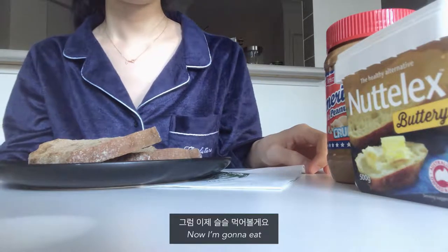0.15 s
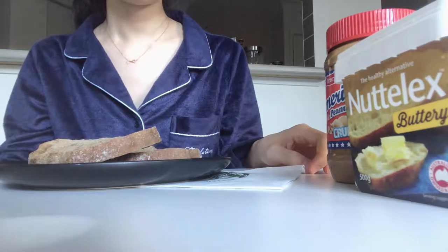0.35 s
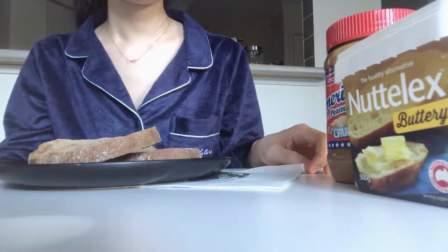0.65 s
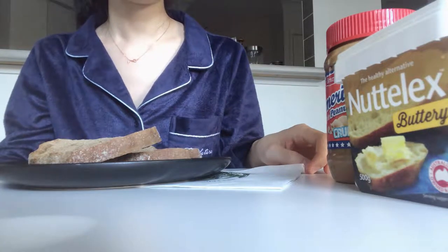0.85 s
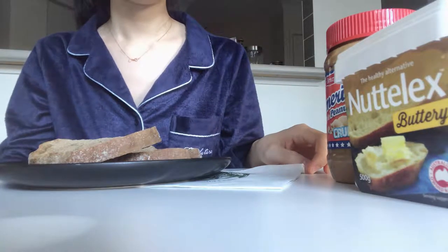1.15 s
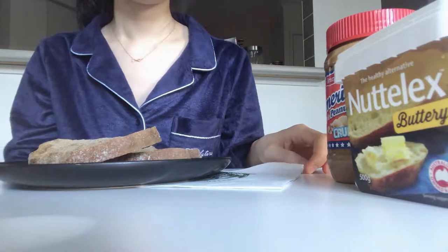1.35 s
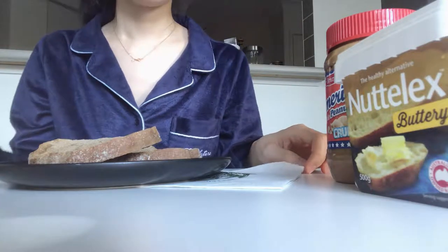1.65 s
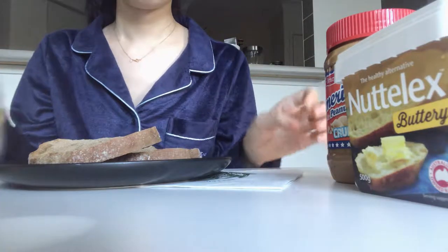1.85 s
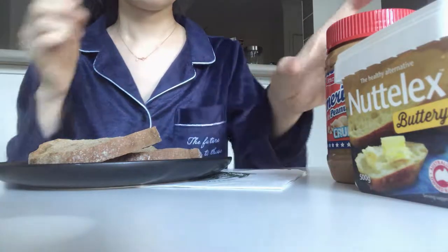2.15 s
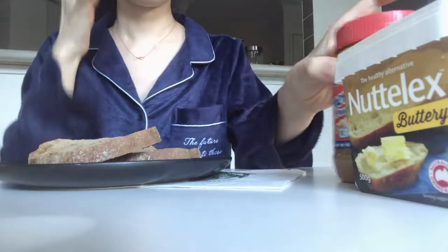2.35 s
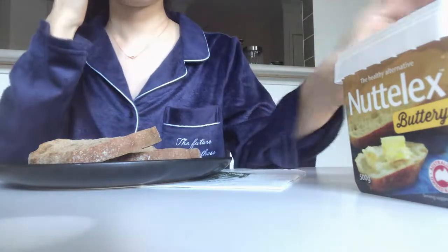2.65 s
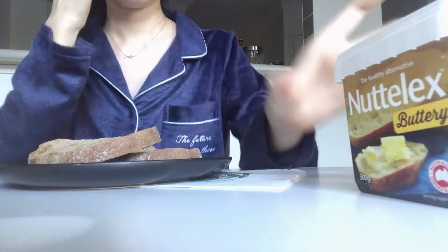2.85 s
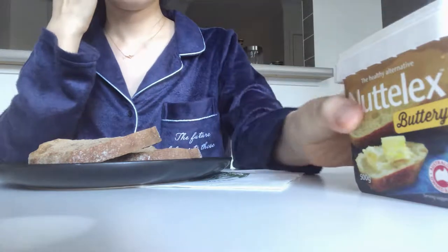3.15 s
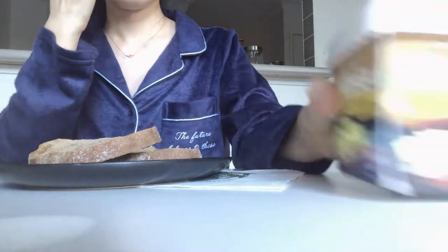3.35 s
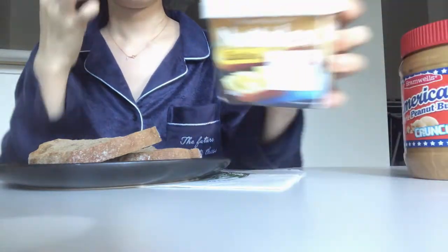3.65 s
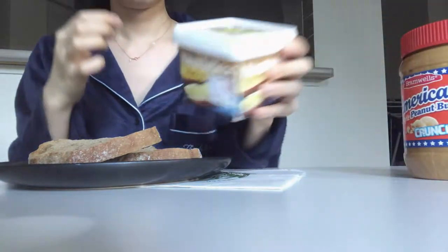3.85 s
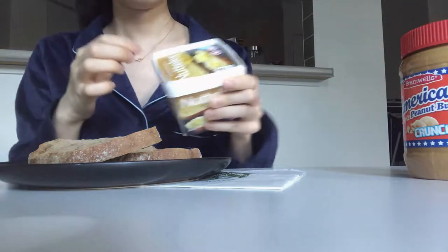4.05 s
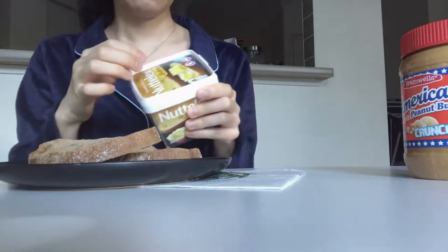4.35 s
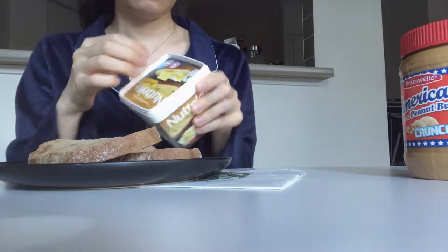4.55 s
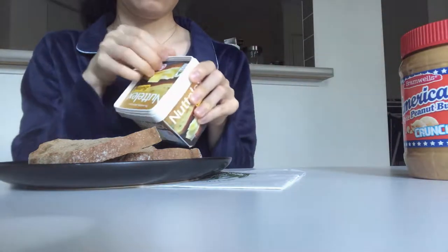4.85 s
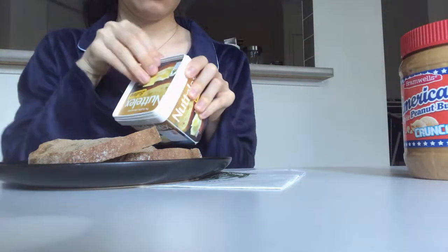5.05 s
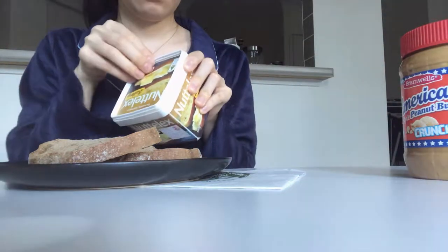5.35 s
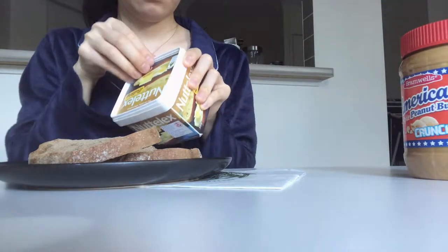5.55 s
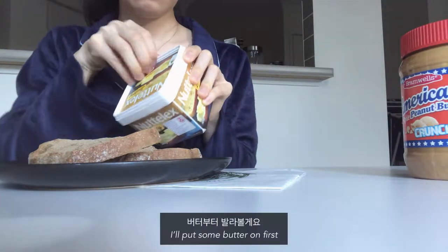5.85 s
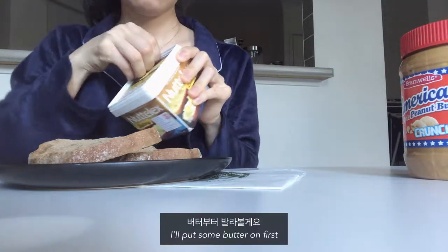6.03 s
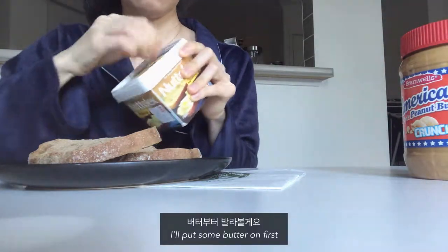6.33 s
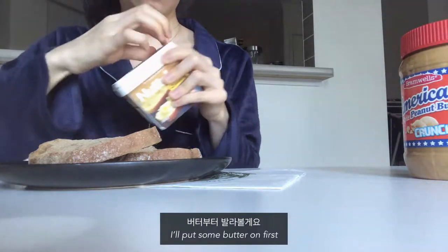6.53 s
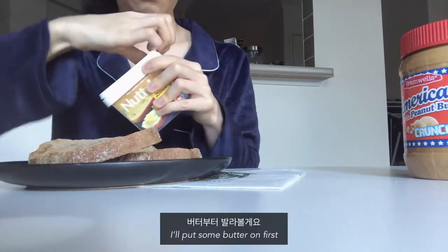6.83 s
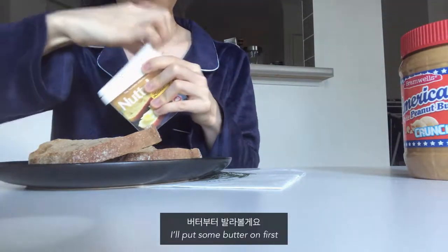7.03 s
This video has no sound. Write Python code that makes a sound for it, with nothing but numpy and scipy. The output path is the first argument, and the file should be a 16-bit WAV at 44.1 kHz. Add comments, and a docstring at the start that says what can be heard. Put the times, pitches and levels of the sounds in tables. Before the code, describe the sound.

Over still room air and a faint unsteady hum, hollow wood is knocked twice, the first blow louder, with weak contacts trailing. After a near pause, cloth swishes across the table with low soft bumps. A quick plastic drag ends in a rattling knock as a tub leaves the surface. Gentle rubbing and light clicks lead to firmer lid snaps, recorded near in mono with short room reflections.

```python
"""At a table in a quiet room, one mono microphone: first a few dull wooden knocks, then a faint thin whistle with a
short dropout. After a tick and a soft brush a sleeve slides over the table top, and a plastic tub is dragged,
chatters on its edge and lifts. Last, fingers rub and pry at the lid, which ticks, snaps along the rim and comes off.
Blows are bending waves, treble first, that ring wood or plastic modes; rubs and cloth are filtered grains of slip.
The room echoes and rings after it all, over still air and a faint, slightly unsteady hum."""
import sys
import numpy as np
from scipy import signal
from scipy.fft import rfft, irfft, next_fast_len
from scipy.io import wavfile
from scipy.ndimage import uniform_filter1d

SR = 44100
rng = np.random.default_rng(int(sys.argv[2]) if len(sys.argv) > 2 else 0)


def int16_out(signal):
    """Quantize to a 16-bit WAV file."""
    q = np.round(np.clip(np.atleast_2d(signal).T, -1, 1) * 32767)
    wavfile.write(sys.argv[1], SR, q.astype(np.int16))


N = 317079
TIME = np.arange(N) / SR  # s
TOP_HZ = 15900  # upper limit of the microphone signal
BLOW = 4096  # samples in the spectrum of one blow
BLOW_HZ = np.maximum(np.fft.rfftfreq(BLOW, 1 / SR), 1)
FULL_SIZE = next_fast_len(N + SR, True)
FULL_HZ = np.maximum(np.fft.rfftfreq(FULL_SIZE, 1 / SR), 1)

# Knocks on the wood. Each row: start in seconds, level in dB, contact cut-off in Hz, hollow boom in Hz, then
# boom, ringing, edge tick and rebound, each in dB re the level.
KNOCKS = [(0.7352, -15, 1240, 388, -15, -19, -37, -12), (0.9246, -21, 1470, 298.6, -3, -17, -36, -14.5),
          (1.172, -57.5, 595, 330, 2, -6.5, -30, 1), (1.256, -44.5, 948, 301, -1, -7.5, -19, 4.5)]
# Modes of the wood. Each row: pitch in Hz, level in dB re the knock's ringing, t60 in seconds.
WOOD = [(82, -3.5, 0.31), (120, -11.5, 0.45), (159.1, -13.5, 0.5), (202, 7.5, 0.17), (230, -6, 0.19),
        (294, -1.5, 0.25), (325.3, 0, 0.27), (377.6, 1.5, 0.31), (429, 1.5, 0.07), (486, -8.5, 0.68),
        (529, 3, 0.18), (555.7, 0.5, 0.23), (629, 3.5, 0.17), (760, -8.5, 0.15), (831, 3, 0.12),
        (1040, -18, 0.06), (1223, -2.5, 0.13), (1330, 2, 0.077), (1560, -16, 0.18), (1885, -7, 0.1)]
# The struck wood jolts back after every knock. Each row: delay in seconds, pitch in Hz, dB re the rebound.
REBOUNDS = [(.0068, 272, -1.5), (0.0112, 457, -1), (.022, 175, -6.5)]


def knocks(thud_hz=720, thud_width=850, lag=0.002714, edge_hz=2450, hollow_t60=0.16,
           jitter=0.18, jitter_share=0.0906):
    """Each knock sends a short thud through hollow wood; the modes share the ring a little differently each time."""
    out = np.zeros(N)
    t = np.arange(SR) / SR
    for s, db, contact_hz, boom_hz, boom_db, ring_db, tick_db, rebound_db in KNOCKS:
        soft = 1 / np.sqrt(1 + (BLOW_HZ / contact_hz) ** 4)
        soft = soft / np.sqrt(1 + (BLOW_HZ / edge_hz) ** 16)
        add(out, s, undb(db) * bend(resonance(BLOW_HZ, thud_hz, thud_width) * soft, lag))
        add(out, s, undb(db + tick_db) * crack(0.0062, hz=4000))
        for delay, hz, jolt_db in REBOUNDS:
            add(out, s + delay, undb(db + rebound_db + jolt_db) * thud(hz))

        modes = [(boom_hz, boom_db, hollow_t60)]
        for hz, wood_db, t60 in WOOD:
            # where the knock lands shifts each mode by chance, 2 dB spread
            modes.append((hz, ring_db + wood_db + 2 * rng.standard_normal(), t60))
        for hz, mode_db, t60 in modes:
            # low modes take a few cycles to build up; a soft contact hardly wakes the high ones
            build = (1 - np.exp(-t * hz / 2.0)) / np.hypot(1, (hz / contact_hz / 1.2) ** 2)
            # close neighbours blur each mode, so that its phase wavers (in cycles)
            waver = jitter * np.interp(t * hz * jitter_share, np.arange(256), rng.standard_normal(256))
            ring = np.sin(2 * np.pi * (hz * t + waver + rng.random()))
            decay = np.exp(-np.log(1000) * t / t60)
            add(out, s, undb(db + mode_db) * build * decay * ring)
    return out


# Clicks of tub and lid. Each row: start in seconds, level in dB, pitch of the flexing wall in Hz,
# rim crack in dB re the level, crack centre in Hz, then recoil and slide in dB re the level.
CLICKS = [(1.787, -48.5, 1080, -3, 2470, -15, -25), (3.3428, -39, 880, -12, 3000, -26, -20),
          (3.358, -57, 1200, 11.5, 3750, -20, -25), (4.838, -44.5, 700, -12, 2100, -9, -31),
          (4.8505, -35.5, 820, -18, 2460, -14, -22), (4.8601, -51, 940, -2, 2400, -7, -25),
          (4.9531, -47.5, 950, -7, 2400, -6.5, -26), (5.032, -44, 790, -18, 2400, -8, -30),
          (5.095, -40.5, 567, -9.5, 2300, -14, -28), (5.103, -41, 820, -19, 2200, -12, -24),
          (5.4368, -25.5, 965, -4.5, 3700, -17.5, -46), (5.504, -32, 905, -3, 6240, -36, -14),
          (6.018, -37.5, 1040, -19, 2200, -25, -21.5), (6.2113, -32, 1130, -9.5, 2300, 1, -16.5),
          (6.3118, -26.5, 810, -18.5, 2100, -13, -50), (6.3294, -24, 1200, -12, 2200, -8, -39),
          (6.374, -45, 1320, -7, 2180, -14, -13), (6.4912, -49, 1430, -10, 2400, -24, -37),
          (6.631, -39.5, 1018, -9, 2420, -22, -13), (6.926, -48, 1200, 0.5, 4200, -14, -31),
          (6.973, -51.5, 554, -14, 2000, -13, -14), (7.009, -33, 860, -27, 4200, -8, -30),
          (7.0172, -35, 497, -35, 2000, -21, -30), (7.1161, -36.5, 610, -23, 2200, -13.5, -20),
          (7.1322, -33.5, 970, 10, 2270, -13.5, -13.5)]
RECOIL_S, RECOIL_RATIO = 0.00342, 0.45  # the wall springs back this much later, at this share of its pitch
THUMP_S, THUMP_HZ, THUMP_DB = 0.00506, 257, -16  # the full tub jolts in the hand; dB re the recoil
SLIDE_RISE_S, SLIDE_FALL_S = 0.013, 0.011  # the contact slides around each click
SLIDE_HISS_DB, SLIDE_BRIGHT_DB = -10.5, 2.5  # hiss re the slide; skin re the rim within that hiss


def clicks(textures, crack_s=0.001):
    """The lid slides and jumps its bead: the rim cracks, the wall flexes and springs back, the tub jolts."""
    out = np.zeros(N)
    for s, db, hz, crack_db, crack_hz, recoil_db, slide_db in CLICKS:
        snap = flex(hz) + undb(crack_db) * crack(crack_s, crack_hz)
        add(out, s, undb(db) * snap)
        add(out, s + RECOIL_S, undb(db + recoil_db) * flex(RECOIL_RATIO * hz))
        add(out, s + THUMP_S, undb(db + recoil_db + THUMP_DB) * thud(THUMP_HZ))
        slide = swell(s, 0, SLIDE_RISE_S, SLIDE_FALL_S)
        out += stroke(textures, slide, db + slide_db, hz, db + slide_db + SLIDE_HISS_DB, SLIDE_BRIGHT_DB)
    return out


# Stiff rim of the tub. Each row: resonance in Hz, width in Hz, level in dB.
RIM = [(1620, 300, -34), (2300, 390, 9), (3240, 900, -3.5), (4020, 960, 5.5), (5070, 360, -4.5),
       (5800, 1300, 2), (8800, 2500, -25), (12800, 4000, -9)]


def crack(decay, hz, spread=0.43, overtone=2.03, overtone_db=-3, edge_hz=12500, edge_width=6000, edge_db=-27):
    """A snap and a dying burst of micro-slips ring the rim near hz and an overtone; its thin edge ticks. Peak 1."""
    burst = rng.standard_normal(BLOW) * np.exp(-np.arange(BLOW) / SR / decay)
    burst[2] += 5  # the snap
    width = spread * hz
    ring = resonance(BLOW_HZ, hz, width) + undb(overtone_db) * resonance(BLOW_HZ, overtone * hz, width)
    edge = undb(edge_db) * resonance(BLOW_HZ, edge_hz, edge_width) ** 2
    wave = irfft(rfft(burst) * (body(BLOW_HZ, RIM) * ring + edge))[:BLOW // 2]
    return wave / np.abs(wave).max()


# Shell of the tub. Each row: resonance in Hz, width in Hz, level in dB.
SHELL = [(279, 35, -4), (503, 72, 1.5), (604, 80, 7.5), (813.5, 38, 7), (931, 98, 6), (1140, 65, -24.5),
         (1279, 66, 1.5), (1590, 41, -32), (2155, 100, -6.5), (4600, 720, -20)]


def flex(hz, damping=0.43, shell_db=-4, lag=0.001963):
    """The tub's wall flexes at a pitch set by the grip and rings the shell. Peak 1."""
    wall = resonance(BLOW_HZ, hz, damping * hz)
    return bend(wall * (wall + undb(shell_db) * body(BLOW_HZ, SHELL)), lag)


# Soft brushing and rubbing strokes: sleeve or hand first, later fingers and lid on the tub.
# Each row: time of the peak in seconds, length in seconds, shell level in dB before trim,
# favoured pitch in Hz, hiss level in dB before trim, skin in dB re the rim.
RUBS = [(1.805, 0.13, -69.5, 1350, -71, -8), (2.943, 0.051, -78, 1300, -63, -1),
        (3.15, .038, -70, 980, -62.5, -11), (4.933, 0.086, -66.5, 1110, -72.5, -19),
        (4.994, 0.025, -59.5, 1580, -64.5, -2), (5.237, 0.13, -68, 970, -67, -7),
        (5.273, 0.024, -59, 1240, -67, -6), (5.524, 0.17, -79, 970, -67, -19),
        (5.91, 0.14, -59, 840, -68, -5), (5.975, 0.061, -54.5, 1110, -78, -11),
        (6.04, 0.047, -50.5, 890, -77, 4), (6.194, 0.019, -52, 1230, -57.5, -3),
        (6.568, 0.13, -66, 1190, -68, 3), (6.745, 0.054, -55, 1660, -62.5, 6),
        (7.035, 0.047, -50, 620, -72, 9), (7.175, 0.074, -62, 1990, -66, -10)]
RUB_RISE_SHARE = 0.58  # sets the rise as a share of the length; the rest sets the fall
SQUEAK_HZ, SQUEAK_WIDTH_HZ, SQUEAK_DB = 4570, 700, -18.5  # a squeak in each stroke; dB re the untrimmed shell


def rubs(textures, shell_db=-1, hiss_db=-1):
    """Each stroke swells and fades; the harder it drives the shell, the more it squeaks."""
    squeak = through(rng.standard_normal(N), resonance(FULL_HZ, SQUEAK_HZ, SQUEAK_WIDTH_HZ) ** 2)
    out = np.zeros(N)
    for s, length, coarse_db, hz, fine_db, bright_db in RUBS:
        envelope = swell(s, 0, RUB_RISE_SHARE * length, (1 - RUB_RISE_SHARE) * length)
        out += stroke(textures, envelope, coarse_db + shell_db, hz, fine_db + hiss_db, bright_db)
        out += undb(coarse_db + SQUEAK_DB) * envelope * squeak
    return out


def friction():
    """Steady stick and slip on plastic: coarse slips in the shell, finer ones in the rim, and the hiss of skin."""
    shell = through(grains(rate=660, spread_db=2.0), body(FULL_HZ, SHELL))
    rim_tone = colour([(1500, 6.5), (5000, 2.5), (14000, -6.5)])
    rim = through(grains(rate=3000, spread_db=5.5), body(FULL_HZ, RIM) * rim_tone)
    skin_tone = colour([(1000, 8), (5500, 2.5), (8500, -2.5), (12000, 5.5), (15000, 3.0)])
    skin = through(grains(rate=8000, spread_db=3), skin_tone)
    return shell, rim, skin


def stroke(textures, envelope, shell_db, hz, hiss_db, bright_db, focus=0.93):
    """One stroke of friction: the shell sounds near a favoured pitch, under a hiss of rim and skin."""
    span = envelope > 1e-4
    shell, rim, skin = (x[span] for x in textures)
    b, a = signal.iirpeak(hz, 1 / focus, fs=SR)
    coarse = unit(signal.lfilter(b, a, shell))
    hiss = unit(rim + undb(bright_db) * skin)
    out = np.zeros(N)
    out[span] = envelope[span] * (undb(shell_db) * coarse + undb(hiss_db) * hiss)
    return out


DRAG_S, DRAG_HOLD_S, DRAG_DB, DRAG_HZ = 3.228, 0.07, -53.5, 980  # the tub's base scrapes over the table
# its edge sticks and slips just before it lifts; the pitch scatters around CHATTER_HZ
CHATTER_S, CHATTER_PER_S, CHATTER_DB, CHATTER_HZ = 3.397, 111, -31.5, 680


def drag(textures, count=3, pitch_scatter=0.1):
    """The tub scrapes over the table, then chatters on its edge under a grind that swells and stops as it lifts."""
    envelope = swell(DRAG_S, DRAG_HOLD_S, rise=0.0085, fall=0.07)
    out = stroke(textures, envelope, DRAG_DB, DRAG_HZ, hiss_db=-73, bright_db=-11)
    slips = CHATTER_S + np.arange(count) / CHATTER_PER_S
    for s in slips:
        hz = CHATTER_HZ * np.exp(pitch_scatter * rng.standard_normal())
        add(out, s, undb(CHATTER_DB) * flex(hz))
    grind = swell(slips[-2], 0, rise=0.028, fall=0.011)
    return out + stroke(textures, grind, shell_db=-45.5, hz=CHATTER_HZ, hiss_db=-75, bright_db=-12)


# Faint thin whistle, then brief high squeaks. Each row: centre in seconds, half length in seconds,
# pitch in Hz, width in Hz, level in dB.
WHISTLES = [(1.33, 0.023, 2946, 50.5, -67.5), (1.47, 0.087, 2976, 30, -78), (1.45, 0.054, 4300, 40.1, -82),
            (3.269, 0.016, 10500, 2240, -60), (3.333, 0.014, 10500, 2500, -70),
            (5.269, .004, 4520, 500, -62)]


def whistles():
    """A faint thin whistle near 3 kHz and above, then brief high squeaks as the tub drags and is rubbed."""
    hiss = rng.standard_normal(N)
    out = np.zeros(N)
    for s, half, hz, width, db in WHISTLES:
        envelope = np.exp(-((TIME - s) / half) ** 2)
        out += undb(db) * envelope * through(hiss, resonance(FULL_HZ, hz, width) ** 2)
    return out


# Soft bumps of the arm and of the rocking tub on the table. Each row: start in seconds, level in dB, pitch in Hz.
BUMPS = [(2.328, -45.5, 166), (2.649, -39.5, 167), (2.716, -41, 153), (2.929, -41, 163),
         (3.161, -38.5, 169), (3.3416, -26.5, 256), (3.366, -31.5, 242), (3.3802, -30, 230)]


def bumps(tick_hz=950, tick_width=700, tick_db=-29, lag=0.00264):
    """Soft contacts push the table top for a few cycles, each with a faint tick."""
    out = np.zeros(N)
    tick = undb(tick_db) * bend(resonance(BLOW_HZ, tick_hz, tick_width) ** 2, lag)
    for s, db, hz in BUMPS:
        add(out, s, undb(db) * (thud(hz) + tick))
    return out


# Swishes of the sleeve. Each row: time of full speed in seconds, hold in seconds, level in dB before trim.
SWISHES = [(2.453, 0.14, -55), (2.89, 0.39, -70.5), (3.532, 0.14, -63.5)]
SWISH_RISE_S, SWISH_FALL_S = 0.063, 0.096
# Arm or tub pressing on the table as it slides. Each row: time of full weight in seconds, hold in seconds,
# rumble in dB before trim.
PUSHES = [(2.453, 0.22, -46.5), (2.967, 0.019, -57.5), (3.245, 0.025, -50), (3.38, 0.012, -42.5)]
PUSH_RISE_S, PUSH_FALL_S = 0.05, 0.099
# Spectrum of the cloth. Each row: frequency in Hz, relative level in dB per Hz.
CLOTH = [(290, -25), (500, -14), (694, -7), (766, 0), (835, -2.5), (1020, -3), (1170, -6.5), (1560, -10.5),
         (2500, -5), (2800, -10.5), (4350, -10.5), (15000, -36)]
# Modes of the table top. Each row: resonance in Hz, width in Hz, level in dB.
TABLE = [(81, 15, 0), (127, 46, 2.5), (172.5, 29, 8), (280, 29, -2), (343, 27, -10)]


def sleeve(cloth_db=-0.5, rumble_db=-2, flutter_db=1.0):
    """Cloth fibres hiss over the table while the dragging arm or tub makes the top rumble."""
    hiss = sum(undb(db) * swell(s, hold, SWISH_RISE_S, SWISH_FALL_S) for s, hold, db in SWISHES)
    rumble = sum(undb(db) * swell(s, hold, PUSH_RISE_S, PUSH_FALL_S) for s, hold, db in PUSHES)
    fibres = through(grains(rate=4500, spread_db=1.0), colour(CLOTH))
    fibres = fibres * undb(flutter_db * wander(rate=65))
    top_tone = body(FULL_HZ, TABLE) * colour([(400, -1.5), (700, -14), (3000, -19)])
    top = through(grains(rate=500, spread_db=2.5), top_tone)
    return undb(cloth_db) * hiss * fibres + undb(rumble_db) * rumble * top


# The room's tail. Each row: frequency in Hz, level in dB re the sound sent into the room, t60 in seconds.
ROOM = [(99, 2.5, 0.2), (297, 0, 0.48), (800, -11, 0.62), (2020, -13.5, 0.54), (5000, -9, 0.44),
        (14000, -15, 0.23)]
# Nearby surfaces. Each row: delay behind the direct sound in seconds, level in dB re the sound sent in.
ECHOES = [(.0056, -24.5), (.0093, -22), (0.0138, -24), (0.0228, -21.5), (.037, -44.5)]


def room(x, build_s=0.0036):
    """Echoes from nearby surfaces, and a diffuse tail with its own decay in each octave."""
    t = np.arange(SR) / SR
    f = np.log2(np.maximum(np.fft.rfftfreq(SR, 1 / SR), 1))
    hz, db, t60 = np.transpose(ROOM)
    noise = rfft(rng.standard_normal(SR))
    response = np.zeros(SR)
    for octave in range(6, 15):  # centres 64 Hz to 16384 Hz
        band = irfft(noise * np.maximum(1 - np.abs(f - octave), 0), SR)
        band_t60 = np.interp(octave, np.log2(hz), t60)
        band_db = np.interp(octave, np.log2(hz), db)
        fade = (1 - np.exp(-t / build_s)) * np.exp(-np.log(1000) * t / band_t60)
        response += undb(band_db) * band * fade / np.sqrt(np.sum(fade ** 2))
    for delay, echo_db in ECHOES:
        response[int(delay * SR)] += undb(echo_db)
    return signal.fftconvolve(x, response)[:N]


# Spectrum of the room air. Each row: frequency in Hz, relative level in dB per Hz.
AIR = [(20, -26), (53, -5), (100, -5.5), (190, -7), (280, -4), (400, -7.5), (780, -11.5), (1450, -21.5),
       (2800, -26.5), (5300, -27), (7900, -29.5), (9000, -34), (15500, -37.5)]
AIR_DB = -66  # rms
# Hum and whine of appliances. Each row: pitch in Hz, rms level in dB.
HUM = [(64.6, -82), (258.4, -79), (511.4, -84.5), (769.8, -103), (5259, -90), (7720, -102), (8005, -104)]


def background(drift=0.25):
    """Still room air and the faint hum and whine of appliances, whose phase drifts (in cycles at 250 Hz)."""
    out = undb(AIR_DB) * through(rng.standard_normal(N), colour(AIR))
    for hz, db in HUM:
        waver = drift * np.sqrt(hz / 250) * wander(rate=16)
        out += undb(db) * unit(np.sin(2 * np.pi * (hz * TIME + waver)))
    return out


def thud(hz, damping=0.46, lag=0.002747):
    """A soft push of a few cycles. Peak 1."""
    return bend(resonance(BLOW_HZ, hz, damping * hz) ** 2, lag)


def bend(response, lag):
    """A blow after crossing a thin plate: delay falls as 1 / sqrt(Hz), so treble leads. Peak 1."""
    # lag is the delay in s at 1 kHz; the delay at TOP_HZ is taken off all frequencies
    cycles = lag * (2 * np.sqrt(1000 * BLOW_HZ) - BLOW_HZ * np.sqrt(1000 / TOP_HZ))
    wave = irfft(response * np.exp(-2j * np.pi * cycles))[:BLOW // 2]
    return wave / np.abs(wave).max()


def resonance(f, hz, width):
    """Response of one damped resonance, gain 1 at its centre."""
    return 1 / (1 + 1j * (f * f - hz * hz) / (f * width))


def body(f, modes):
    """Response of a set of modes; they radiate poorly below the first, lowest one."""
    lowest = modes[0][0]
    radiation = f ** 2 / (f ** 2 + lowest ** 2)
    return sum(undb(db) * resonance(f, hz, width) for hz, width, db in modes) * radiation


def grains(rate, spread_db):
    """Tiny slips at random moments, about `rate` per second, with uneven sizes."""
    slips = rng.random(N) < rate / SR
    return slips * rng.choice([-1, 1], N) * undb(spread_db * rng.standard_normal(N))


def swell(s, hold, rise, fall):
    """Envelope that rises smoothly to 1 at time s, holds, and falls."""
    t = TIME - s
    before = np.minimum(t, 0) / rise
    after = np.maximum(t - hold, 0) / fall
    return np.exp(-np.minimum(before ** 2 + after ** 2, 20))


def wander(rate):
    """Smooth chance with a spread near 1, drawn anew `rate` times per second."""
    knots = rng.standard_normal(4096)
    return np.interp(TIME * rate, np.arange(len(knots)), knots)


def colour(points):
    """Gain of a (Hz, dB) outline."""
    hz, db = np.transpose(points)
    return undb(np.interp(np.log(FULL_HZ), np.log(hz), db))


def through(x, response):
    """Filter a whole track; the result has rms 1."""
    return unit(irfft(rfft(x, FULL_SIZE) * response, FULL_SIZE)[:N])


def undb(db):
    """Decibels to gain."""
    return 10 ** (np.asarray(db) / 20)


def unit(x):
    """Scale to rms 1."""
    return x / np.sqrt(np.mean(x ** 2))


def add(track, s, sound):
    """Mix a sound into a track from time s."""
    start = int(s * SR)
    part = sound[:max(len(track) - start, 0)]
    track[start:start + len(part)] += part


def scene(knock_wet_db=0, tub_wet_db=0, table_wet_db=-3):
    """Knocks, table and tub share one room; the wet levels set how much of each is sent into it."""
    wood = knocks()
    textures = friction()
    tub = clicks(textures) + rubs(textures) + drag(textures) + whistles()
    table = bumps() + sleeve()
    sent = undb(knock_wet_db) * wood + undb(tub_wet_db) * tub + undb(table_wet_db) * table
    return (wood + tub + table + room(sent) + background())[None]


# The dropout: its start and its end in seconds.
MUTE_S = (1.461, 1.499)


def record(dry):
    """The sound drops out for an instant, with short ramps, and a steep low-pass cuts the top."""
    live = 1.0 * ((TIME < MUTE_S[0]) | (TIME > MUTE_S[1]))
    live = uniform_filter1d(live, size=64)
    low_pass = signal.ellip(8, 0.2, 70, TOP_HZ, fs=SR, output="sos")
    return signal.sosfilt(low_pass, dry * live)


dry = scene()
out = record(dry)
int16_out(out)
```